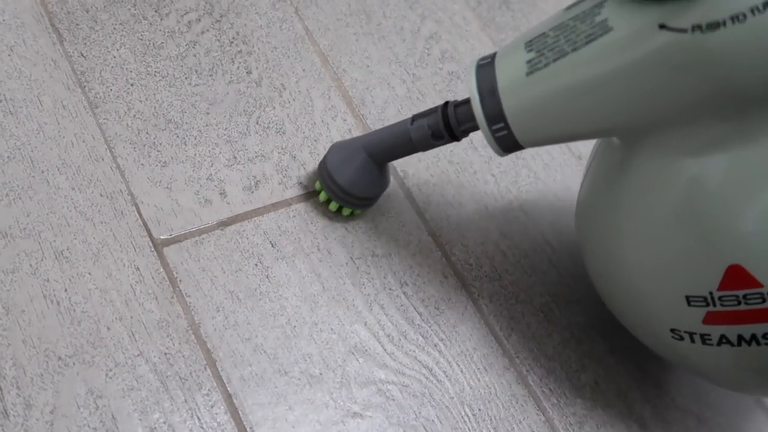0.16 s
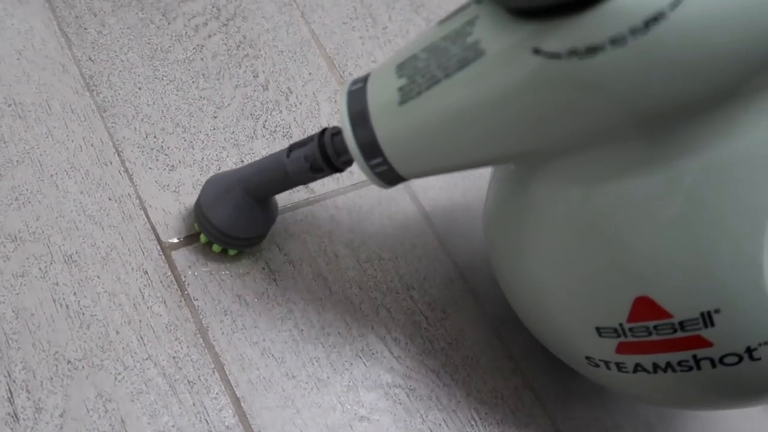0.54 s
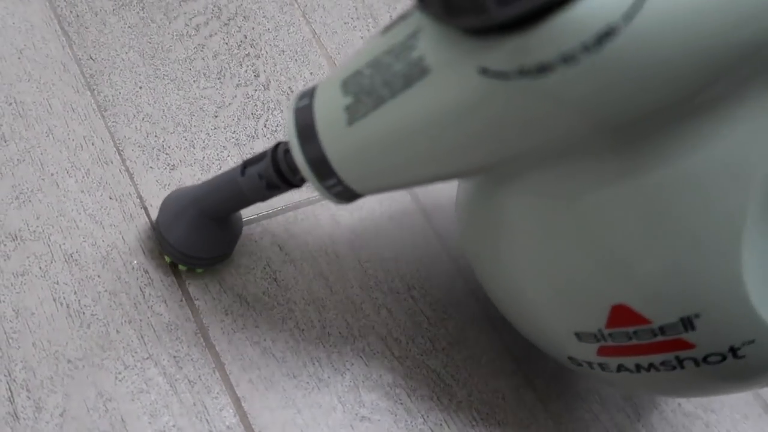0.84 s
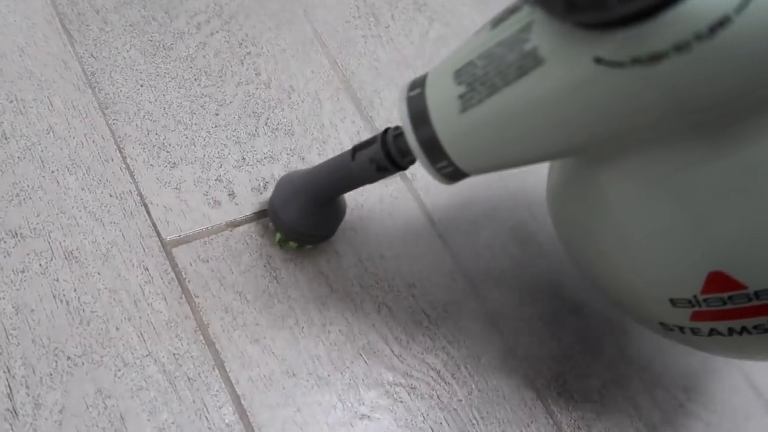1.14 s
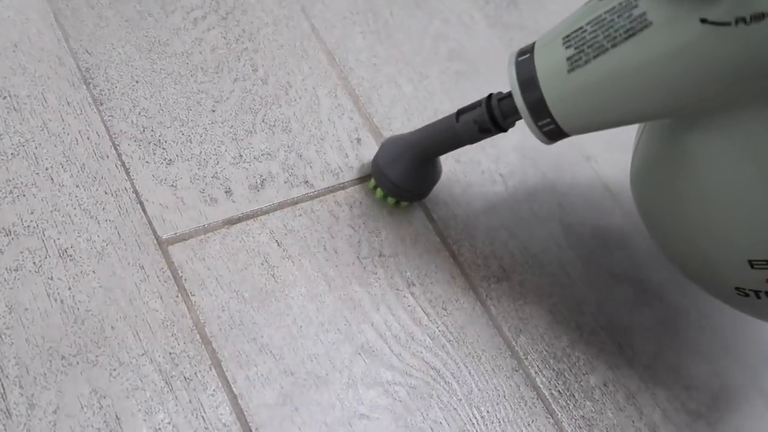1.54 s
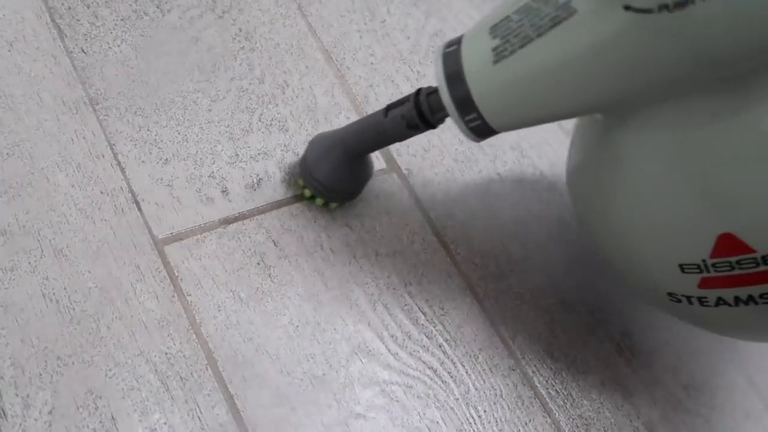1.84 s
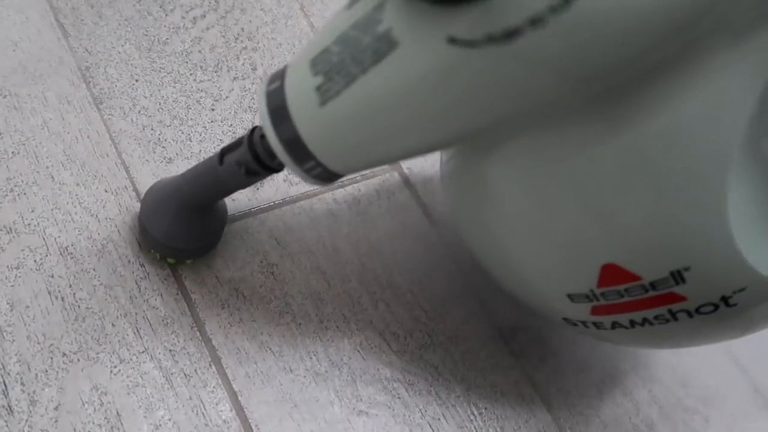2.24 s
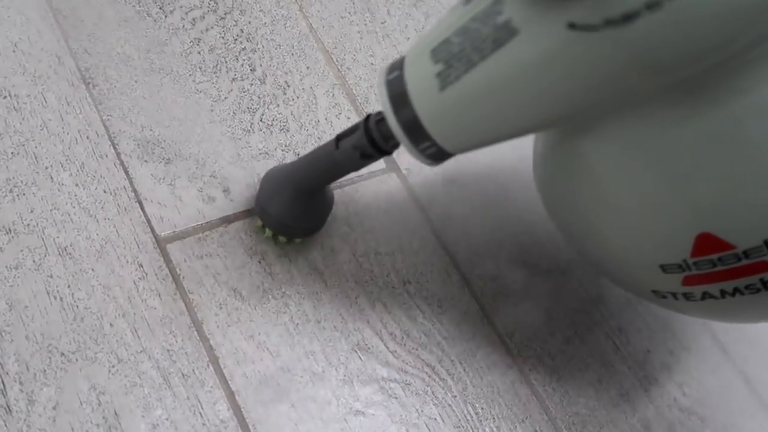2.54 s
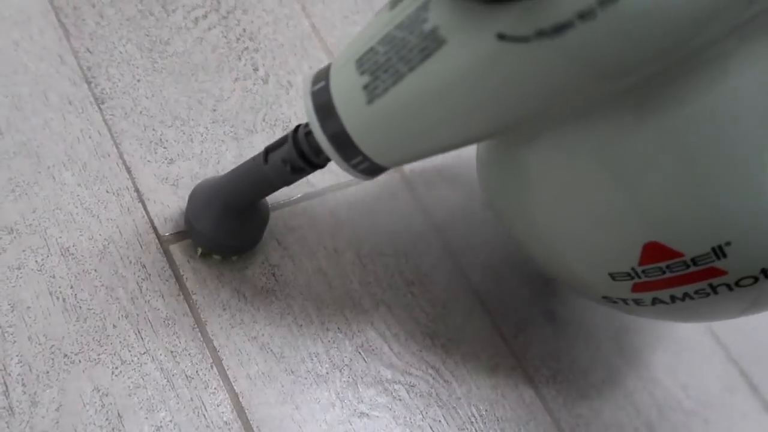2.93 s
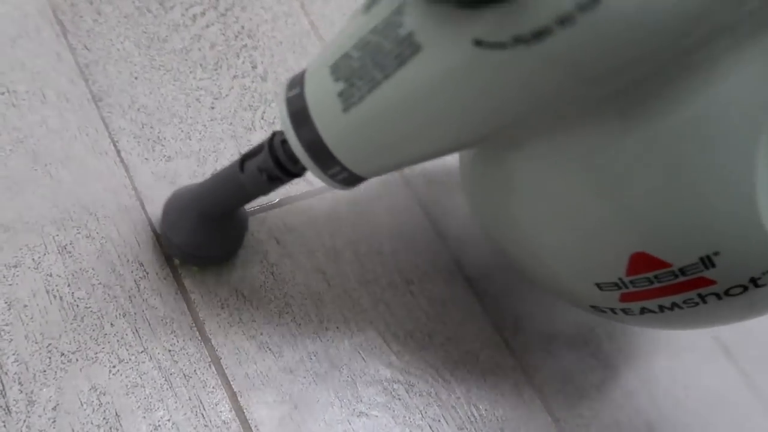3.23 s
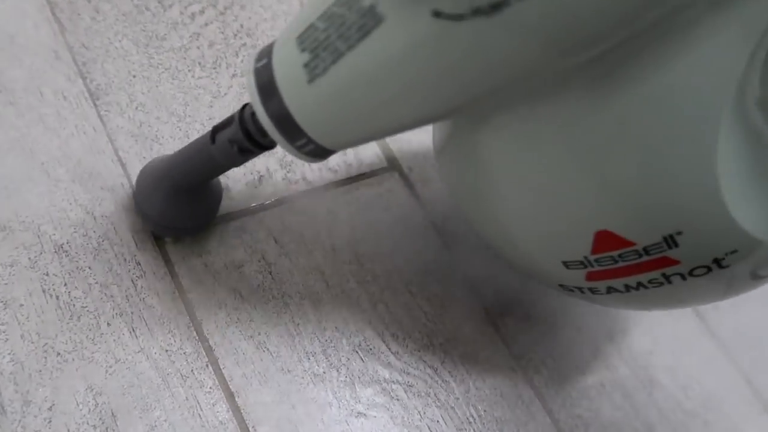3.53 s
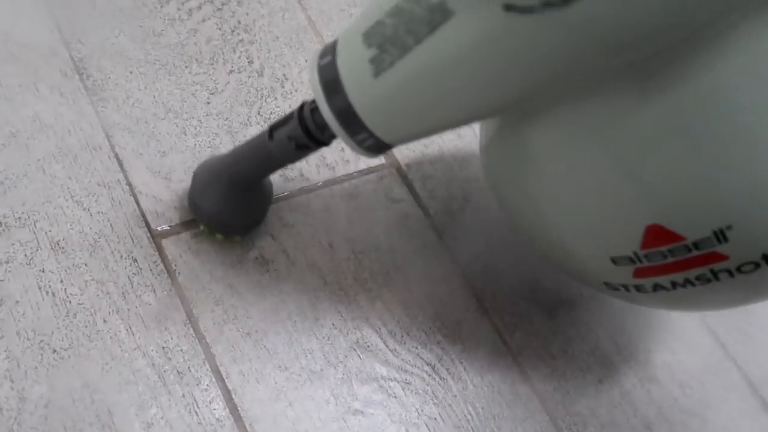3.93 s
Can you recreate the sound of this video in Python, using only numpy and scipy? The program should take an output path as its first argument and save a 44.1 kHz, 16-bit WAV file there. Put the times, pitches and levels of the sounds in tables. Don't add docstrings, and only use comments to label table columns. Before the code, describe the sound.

Close, continuous rushing steam with sputtering bursts and sharp droplet snaps over a faint boiler rumble, briefly muffled as the brush bumps a tile edge.

```python
import sys
import numpy as np
from scipy import signal
from scipy.fft import rfft, irfft
from scipy.io import wavfile
from scipy.ndimage import uniform_filter1d

SR = 44100
rng = np.random.default_rng(int(sys.argv[2]) if len(sys.argv) > 2 else 0)


def attenuation_scalar(level_db):
    decades = np.asarray(level_db, float) / 20
    return 10 ** decades


def store_pcm(level_fs):
    pcm = np.round(np.clip(level_fs, -1, 1) * 32767).astype(np.int16)
    wavfile.write(sys.argv[1], SR, np.atleast_2d(pcm).T)


N = 179795


def evened(x):
    return x / np.sqrt(np.mean(x ** 2) + 1e-20)


def read(points, hz):
    f, value = np.transpose(points)
    return np.interp(np.log(hz + 1), np.log(f + 1), value)


def coloured(x, spectrum):
    hz = np.fft.rfftfreq(N, 1 / SR)
    below, above = (spectrum[0][0] / 2, -90), (spectrum[-1][0] * 2, -90)
    closed = [below] + list(spectrum) + [above]
    return evened(irfft(rfft(x) * attenuation_scalar(read(closed, hz)), N))


def wander(top_hz):
    hz = np.fft.rfftfreq(N, 1 / SR)
    return evened(irfft(rfft(rng.standard_normal(N)) / (1 + (hz / top_hz) ** 2), N))


def turbulence(patchy_db, drops_per_s, spread_db, share):
    z = signal.stft(rng.standard_normal((2, N)), nperseg=256)[2]
    patches = uniform_filter1d(rng.standard_normal(z.shape[1:]), size=5, axis=0)
    patches = evened(uniform_filter1d(patches, size=12, axis=1))
    smooth = signal.istft(z * attenuation_scalar(patchy_db * patches), nperseg=256)[1][:, :N]
    hits = (rng.random((2, N)) < drops_per_s / SR) * rng.choice([-1., 1.], (2, N))
    ticks = hits * attenuation_scalar(spread_db * np.minimum(rng.exponential(1, (2, N)), 4))
    share = np.clip(share, 0, 1)
    return np.sqrt(1 - share) * evened(smooth) + np.sqrt(share) * evened(ticks)


# (time [s], steam pressure at the nozzle [dB], brush facing the camera [0-1])
HAND_STROKE = [(0, -18, 0.73), (.15, -20.5, 0.66), (.3, -19, 0.66), (.6, -19, 0.04), (.9, -20.2, 0.11),
               (1.1, -19.5, 0.18), (1.28, -19.5, 0.53), (1.45, -19.5, 0.9), (1.7, -18.5, 0.63),
               (1.85, -18, 1), (2.05, -18.5, 0.8), (2.2, -19, 0.3), (2.55, -19, 0.4), (2.75, -18.8, 0.72),
               (2.95, -18.5, 0.34), (3.3, -20, 0.42), (3.8, -19.5, 0.56), (4.08, -18.5, 0.45)]


def stroke(t):
    s, pressure_db, facing = np.transpose(HAND_STROKE)
    return np.interp(t, s, pressure_db), np.clip(np.interp(t, s, facing), 0, 1)


MEAN_DB = -19.3


def part_db(law, t):
    db, swing, shut, face_db, drift_db = law
    pressure_db, facing = stroke(t)
    follow_db = swing * (pressure_db - MEAN_DB) + shut * smother_db(t)
    return MEAN_DB + db + follow_db + face_db * facing + drift_db * t


# (frequency [Hz], density [dB per Hz])
ROAR_COLOUR = [(400, -23), (520, -17.5), (720, -5), (950, -5), (1300, 1), (1500, -3), (1800, 2),
               (2050, 0.5), (2300, -6)]
WASH_COLOUR = [(1900, -19), (2200, -7.5), (2420, -4.5), (2650, -2.5), (3150, -1.5), (3400, -7), (3900, -33)]
HISS_COLOUR = [(2800, -30), (3250, -6), (3450, 0), (4000, -0.25), (4500, -1), (4800, -2), (5300, -2.5),
               (5800, -5), (7300, -5), (8500, -13.5), (10500, -18)]
FIZZ_COLOUR = [(5500, -27), (7000, -11.5), (8500, 0), (10000, -2), (12200, -0.5), (14500, -8.5),
               (16000, -2), (19000, -41)]
# (level [dB], share of pressure swings [ratio], share of smothering [ratio],
# gain facing the camera [dB], drift [dB per s])
ROAR_FOLLOWS = (-15, 0.5, 0.27, -0.14, -1.08)
WASH_FOLLOWS = (-9, 1.1, 0.9, 1.26, -0.61)
FIZZ_FOLLOWS = (-3.5, 0.85, 1.1, 2, -0.66)


def jet():
    t = np.arange(N) / SR
    surge_db = spit_db(t) + .7 * wander(40.)
    roar_db = part_db(ROAR_FOLLOWS, t) + 0.16 * surge_db
    wash_db = part_db(WASH_FOLLOWS, t) + 0.64 * surge_db
    hiss_db = stroke(t)[0] + smother_db(t) + 0.25 + 0.7 * surge_db
    fizz_db = part_db(FIZZ_FOLLOWS, t) + 0.61 * surge_db
    roar = attenuation_scalar(roar_db) * coloured(turbulence(0.9, 900, 3.8, 0.064), ROAR_COLOUR)
    wash = attenuation_scalar(wash_db) * coloured(turbulence(1.0, 1200, 3.6, 0.27), WASH_COLOUR)
    hiss = attenuation_scalar(hiss_db) * coloured(turbulence(0.83, 1500, 4.9, 0.16), HISS_COLOUR)
    fizz = attenuation_scalar(fizz_db) * coloured(turbulence(1.0, 2700, 7.1, 0.2), FIZZ_COLOUR)
    return roar + wash + hiss + fizz


# (frequency [Hz], density [dB per Hz])
BOILER_COLOUR = [(15, -64), (25, -42), (97, -21.5), (194, -14.5), (237, -5), (263, -3.5), (377, -7),
                 (442, -2.5), (485, -7), (600, 1), (780, -30), (1320, -120)]


def boiler():
    t = np.arange(N) / SR
    shudder_db = .7 * wander(8.)
    level_db = -56.5 + 0.74 * (part_db(ROAR_FOLLOWS, t) + 37.5) + shudder_db
    return attenuation_scalar(level_db) * coloured(rng.standard_normal(N), BOILER_COLOUR)


# (delay [s], level [dB])
REFLECTIONS = [(.0016, -37.5), (.0058, -21.5), (.0061, -23), (.0083, -32), (0.0133, -20.5), (0.0179, -22.5)]


def echoes(source):
    early = np.zeros(1024)
    early[[round(s * SR) for s, db in REFLECTIONS]] = [attenuation_scalar(db) for s, db in REFLECTIONS]
    return source + signal.oaconvolve(source, early[None], axes=1)[:, :N]


# (frequency [Hz], t60 [s])
ROOM_DECAY = [(100, 0.54), (1000, 0.2), (4000, 0.47), (15000, 0.21)]


def room_tail(wet_db, size=16384):
    noise = rng.standard_normal(size) * (np.arange(size) > .004 * SR)
    f, t, z = signal.stft(noise, SR, nperseg=256)
    decay = attenuation_scalar(-60 * t / read(ROOM_DECAY, f)[:, None])
    tail = signal.istft(z * decay, SR, nperseg=256)[1]
    return attenuation_scalar(wet_db) * tail / np.linalg.norm(tail)


def room(source):
    turn = 2 * np.pi * 1.266 * np.arange(N) / SR
    out = np.zeros((2, N))
    for k in range(3):
        window = np.sqrt(2 / 3) * np.cos(turn + k * np.pi / 3)
        out += signal.oaconvolve(source * window, room_tail(-11.)[None], axes=1)[:, :N]
    return out


# (frequency [Hz], likeness [0-1], left leads by [radians], left minus right [dB])
MIC_PORTS = [(1000, 0.91, 0.063, 7.5), (2960, 0.93, 0.17, -1.5), (4200, 0.86, 0.17, -2),
             (5330, 0.76, 0.51, -1), (6240, 0.95, 1.03, -1.5), (7960, 0.3, 1.15, -.8),
             (10800, 0.18, 3.1, -1), (13350, 0.65, 2, 0), (16200, 0, 3.3, 8)]


def ports(strands):
    hz = np.fft.rfftfreq(N, 1 / SR)
    f, *columns = np.transpose(MIC_PORTS)
    alike, lead, lean_db = (read(np.transpose([f, c]), hz) for c in columns)
    alike = np.clip(alike, 0, 1)
    a, b = rfft(strands)
    shared = np.sqrt((1 + alike) / 2) * a
    apart = np.sqrt((1 - alike) / 2) * b
    skew = attenuation_scalar(lean_db / 2) * np.exp(.5j * lead)
    return irfft(np.array([(shared + apart) * skew, (shared - apart) / skew]), N)


def aim(pair):
    narrow_db, bright_db = -3.5, 1
    facing = stroke(np.arange(N) / SR)[1] - .5
    mid = (pair[0] + pair[1]) / 2
    side = attenuation_scalar(narrow_db * facing) * (pair[0] - pair[1]) / 2
    treble = signal.sosfiltfilt(signal.butter(2, 9000, "high", fs=SR, output="sos"), mid)
    mid = mid + (attenuation_scalar(bright_db * facing) - 1) * treble
    return np.array([mid + side, mid - side])


# (time [s], swell, or dip if negative [dB])
WATER_SLUGS = [(.566, -0.5), (.607, 3), (.848, 4), (1.405, 4.5), (1.83, 1), (1.9, 1.5), (2.033, 0.5),
               (2.17, 3), (2.437, 3.3), (2.812, 2.5), (2.848, 4), (3.127, 4), (3.294, 4), (3.358, 3),
               (3.838, 3)]


def spit_db(t):
    width_s = 0.007
    return sum(db * np.exp(-.5 * ((t - at) / width_s) ** 2) for at, db in WATER_SLUGS)


# (time [s], peak level [dB])
LARGE_DROPS = [
    (.570, -9),
    (.626, -8),
    (.858, -9),
    (1.828, -11),
    (1.979, -10),
    (2.042, -11),
    (2.484, -11),
    (3.137, -12),
    (3.358, -11),
    (3.856, -10),
]


def drops():
    clicks = np.zeros(N)
    clicks[[round(s * SR) for s, db in LARGE_DROPS]] = [attenuation_scalar(db) for s, db in LARGE_DROPS]
    snaps = coloured(clicks, HISS_COLOUR)
    return snaps * clicks.max() / abs(snaps).max()


def smother_db(t):
    start_s, depth_db = 3.365, -4.5
    shut_s, held_s, freed_s = 0.0089, 0.051, 0.36
    corners = start_s + np.cumsum([0, shut_s, held_s, freed_s])
    return depth_db * np.interp(t, corners, [0, 1, 1, 0])


# (time [s], level [dB], body mode [Hz], t60 [s])
BODY_KNOCKS = [
    (3.38, -38.5, 255, .13),
    (3.38, -53, 232, .22),
    (3.382, -44, 670, .15),
    (3.38, -55, 165, .1),
    (3.425, -47, 445, .16),
    (3.43, -44, 815, .22),
    (3.43, -47, 660, .1),
]


def bump():
    out = np.zeros(N)
    for s, db, hz, t60 in BODY_KNOCKS:
        t = np.maximum(np.arange(N) / SR - s, 0)
        soft_onset = 1 - np.exp(-t / .011)
        out += attenuation_scalar(db - 60 * t / t60) * np.sin(2 * np.pi * hz * t) * soft_onset
    return out


def scene():
    source = jet()
    source[0] += drops()
    out = echoes(source) + room(source)
    return attenuation_scalar(-0.03) * aim(ports(out)) + boiler() + bump()


# (frequency [Hz], share in the sum [ratio], share in the difference [ratio])
FAINT_LINES = [(60, .13, 0), (300, .35, 0), (700, .2, 0), (1400, .4, 0), (2150, .95, 0), (2900, .4, .8),
               (5000, .45, .7), (9000, .7, .5), (12000, .85, .55), (15000, 1.25, 1.2)]


def thin(dry):
    sum_top_hz, sum_climb_hz = 13100, 3000
    apart_low_hz, apart_climb_hz = 3200, 1700
    band_hz, top_hz = 345, 15720
    mid_side = np.array([dry[0] + dry[1], dry[0] - dry[1]]) / 2
    hz, t, pair = signal.stft(mid_side, SR, "cosine", nperseg=2048, noverlap=1024)
    f, *shares = np.transpose(FAINT_LINES)
    share = np.array([read(np.transpose([f, c]), hz) for c in shares])[:, :, None]
    around = np.sqrt(uniform_filter1d(abs(pair) ** 2, size=24, axis=1))
    mid, side = pair * (abs(pair) > share * around)
    band = (hz // band_hz).astype(int)
    edge_hz = band_hz * band[:, None]
    facing = stroke(t)[1]
    ragged = uniform_filter1d(rng.standard_normal((2, band.max() + 1, len(t))), size=2)[:, band]
    sum_edge_hz = edge_hz + 1100 * ragged[1] * (edge_hz > 12700)
    mid = mid * (sum_edge_hz < sum_top_hz + sum_climb_hz * facing)
    apart_edge_hz = edge_hz + band_hz + 350 * ragged[0]
    side = side * (apart_edge_hz > apart_low_hz + apart_climb_hz * facing ** 2) * (hz[:, None] > 3080)
    side = side * (edge_hz + 500 * ragged[0] < 15400)
    kept = np.array([mid + side, mid - side]) * (hz[:, None] < top_hz)
    return signal.istft(kept, SR, "cosine", nperseg=2048, noverlap=1024)[1][:, :N]


def band_limit(x):
    return signal.sosfilt(signal.butter(12, 16400, fs=SR, output="sos"), x)


def record(dry):
    mix = thin(dry)
    return band_limit(mix)


dry = scene()
out = record(dry)
store_pcm(out)
```